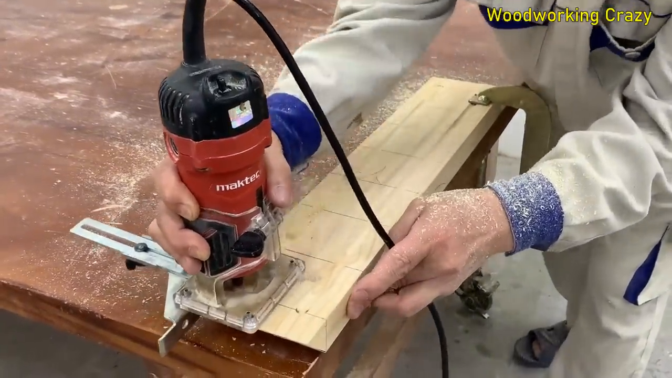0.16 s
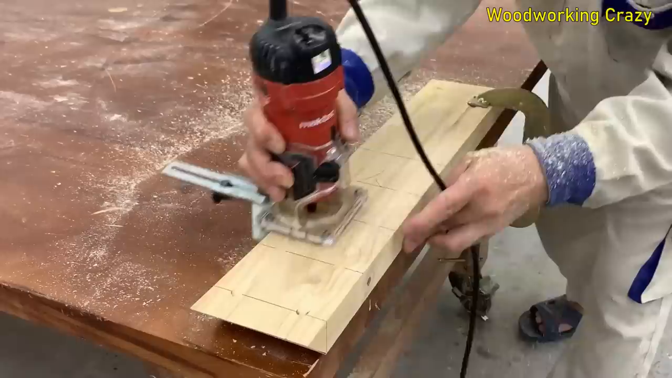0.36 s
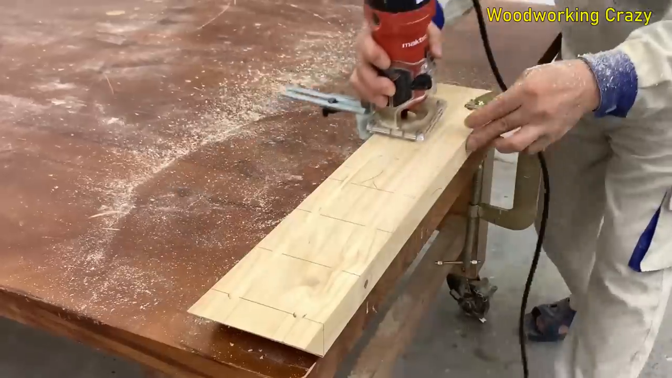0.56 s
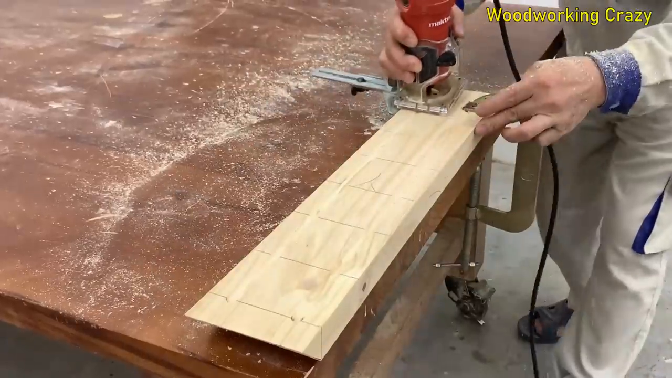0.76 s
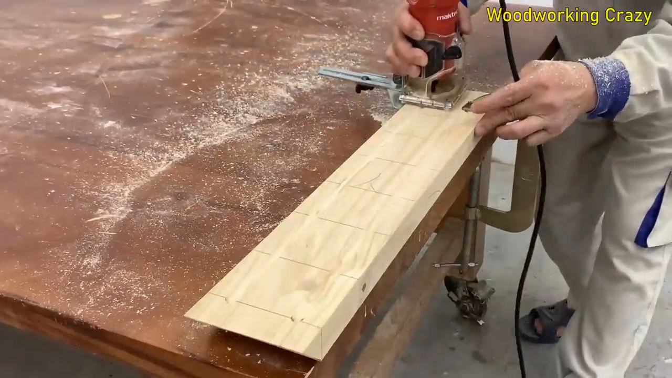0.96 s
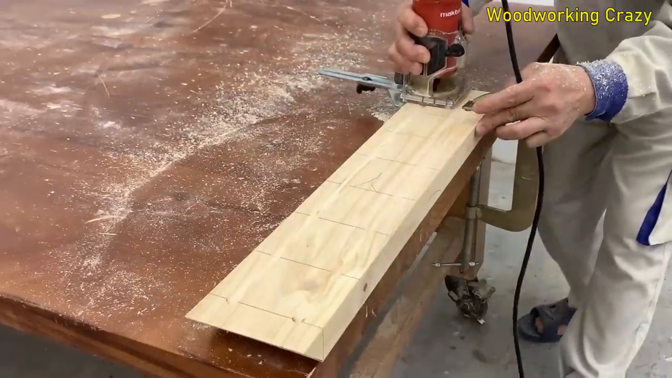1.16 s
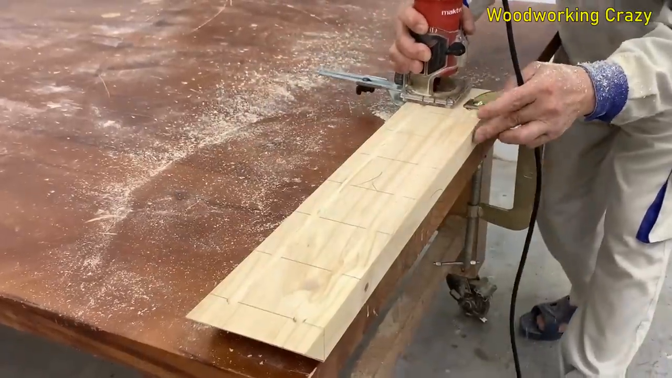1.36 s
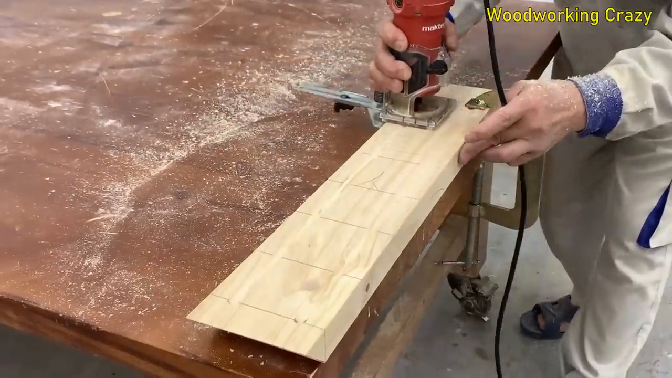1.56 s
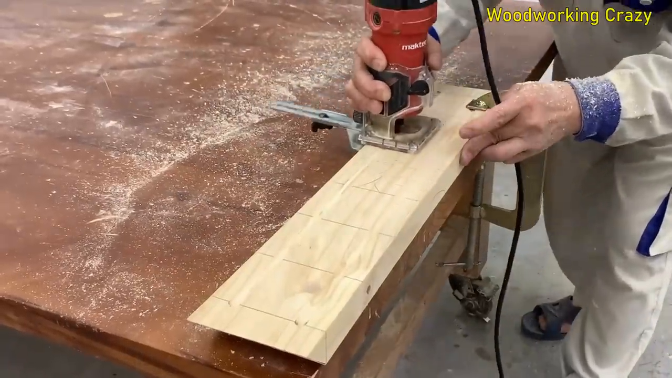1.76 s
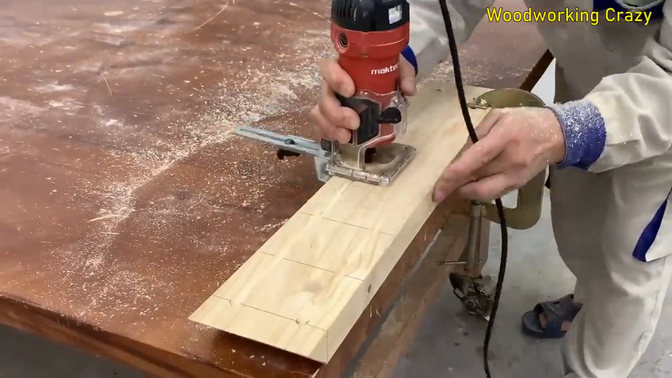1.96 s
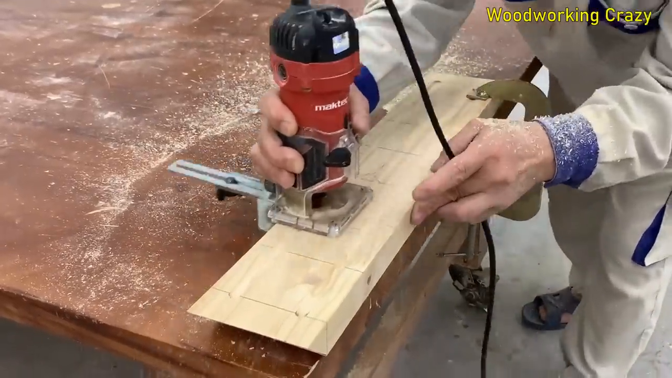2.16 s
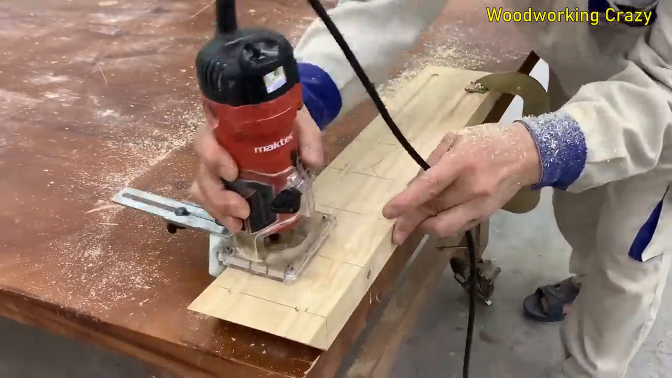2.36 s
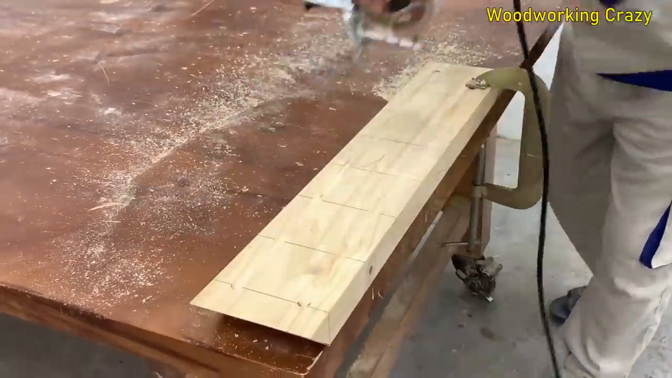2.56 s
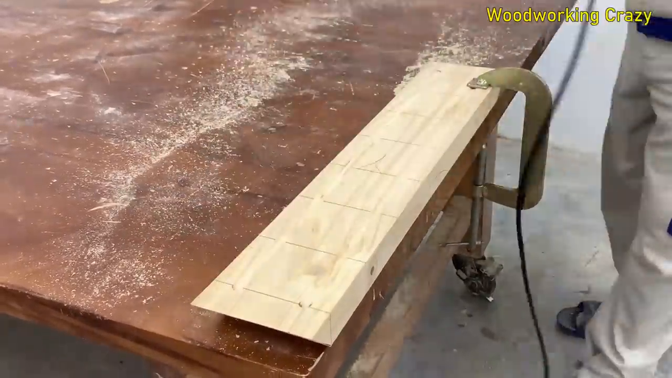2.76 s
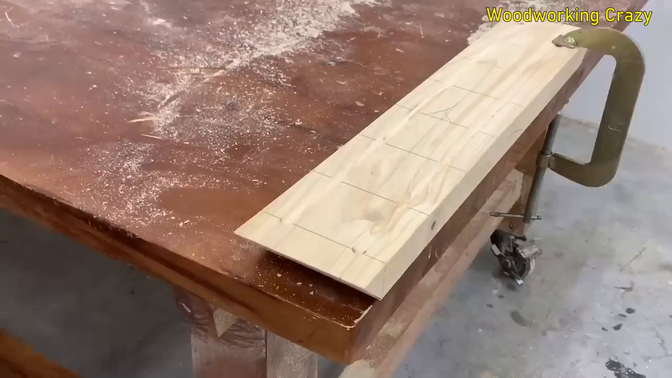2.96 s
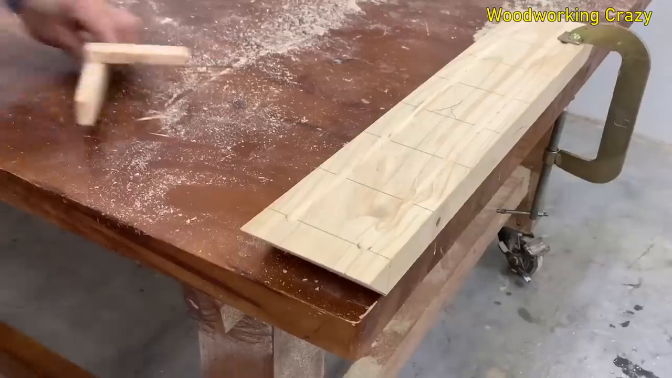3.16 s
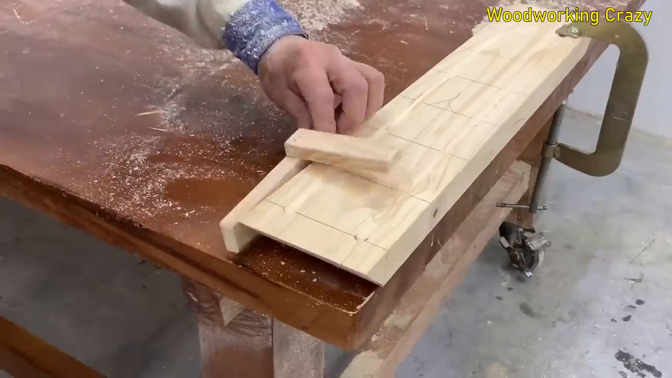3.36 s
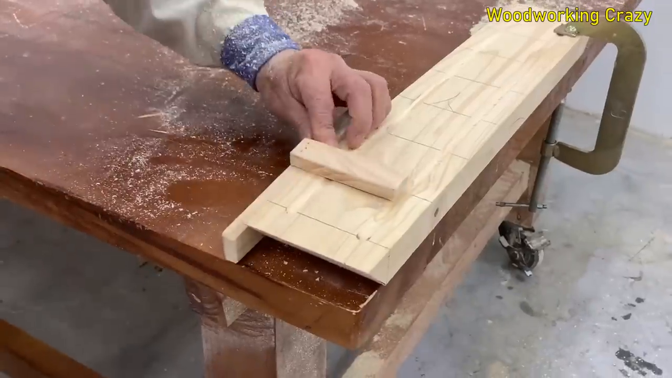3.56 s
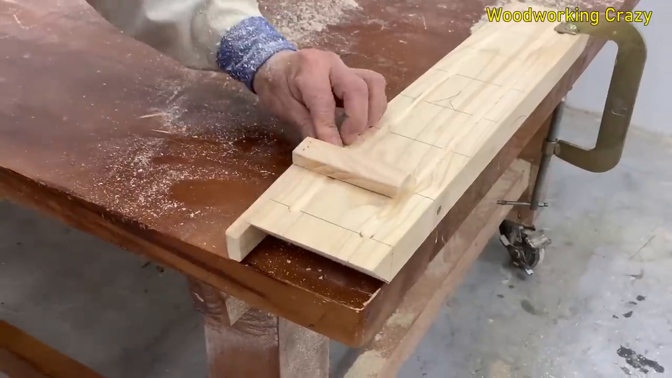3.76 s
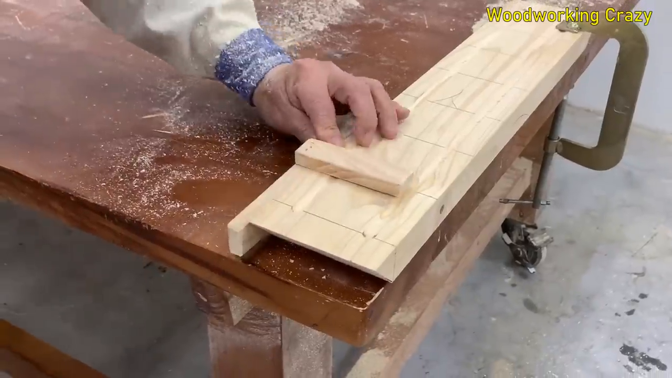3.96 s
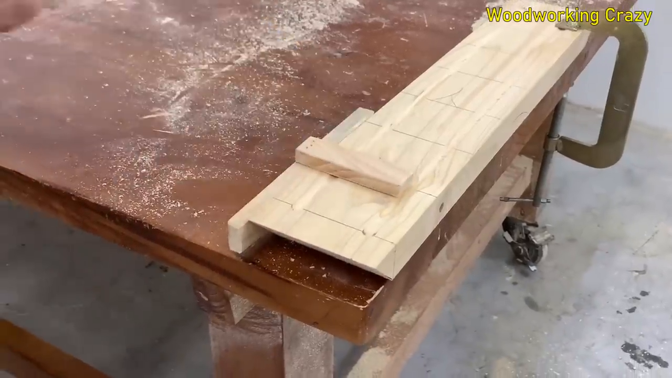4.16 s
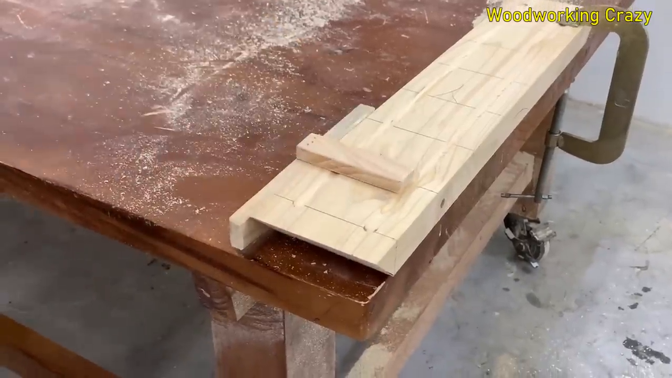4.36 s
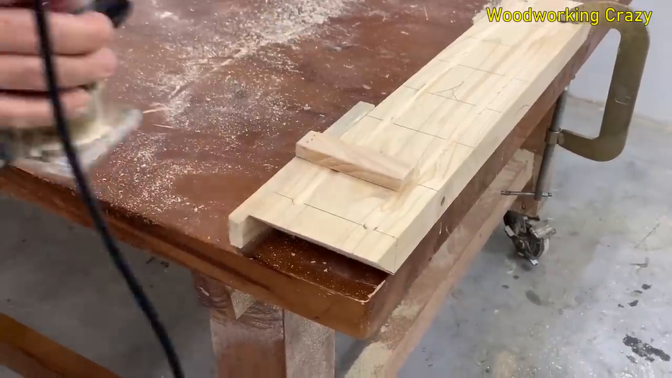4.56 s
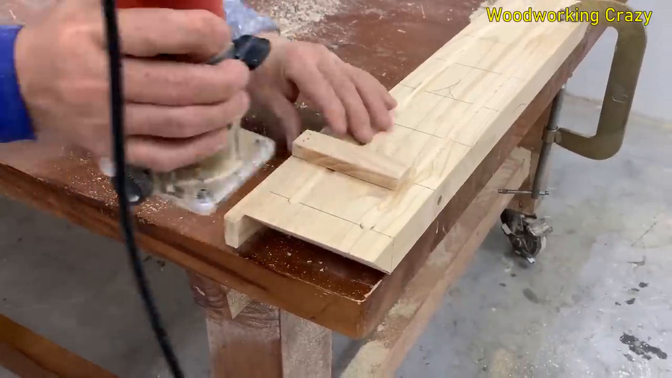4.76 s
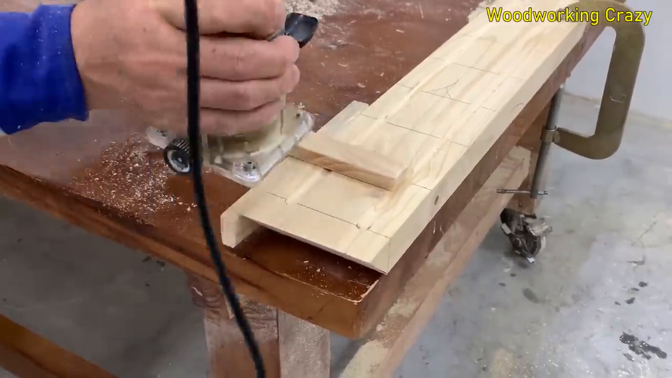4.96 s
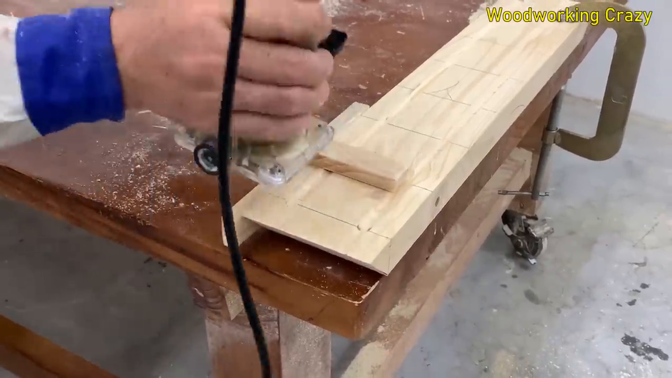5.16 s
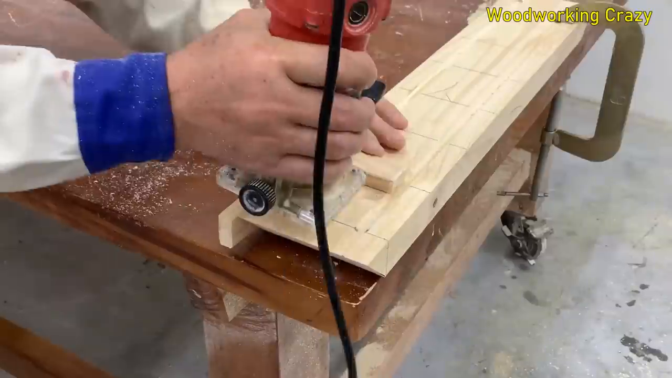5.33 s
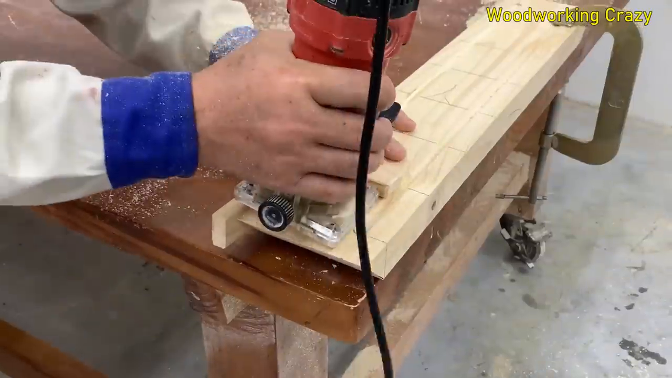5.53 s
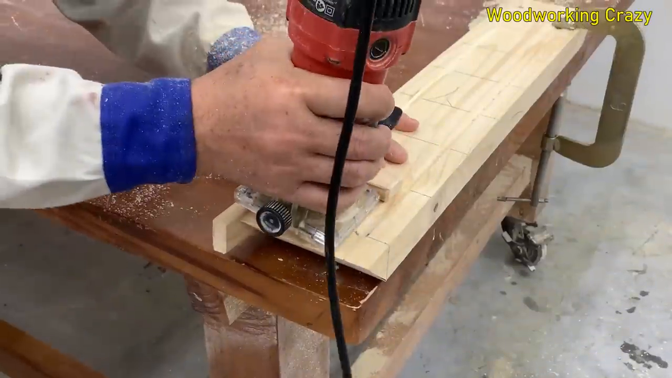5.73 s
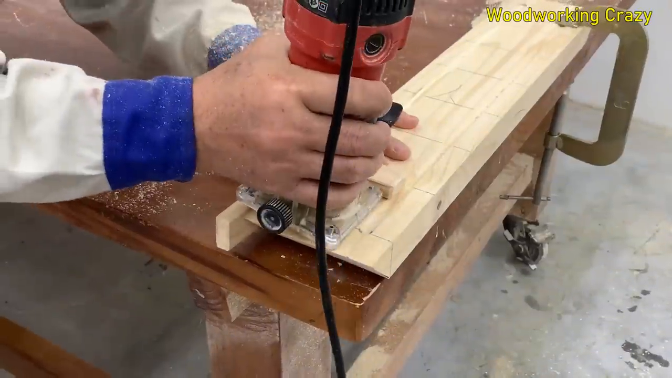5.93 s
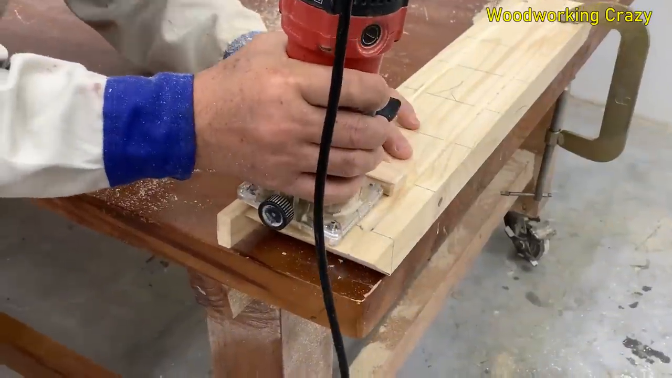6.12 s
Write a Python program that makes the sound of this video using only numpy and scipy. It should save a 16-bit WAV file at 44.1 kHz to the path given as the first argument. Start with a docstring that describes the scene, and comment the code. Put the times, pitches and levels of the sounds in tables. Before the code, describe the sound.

Close stereo pickup in a workshop: a handheld router's broad, bright air noise surrounds a wavering whine. After a free run, it growls and chatters through wood, pitch dragging down a little. The sound stops abruptly, leaving a quiet drone and faint buzz, with dry clicks and knocks of a small wood piece and a slight dusty scuff. A jolt restarts the motor, which sweeps up rapidly to a hissy, unloaded whirr.

```python
"""In a workshop that drones behind it, a hand-held wood router whines up to speed and cuts a groove.
The cut drags its pitch down and lifts its overtones; its sound is cut off in an instant, a wooden block
is set down, then it runs up again. Sines at orders of the motor speed make the whine, shaped stereo noise
the air and the drone, sines the buzz, groans and whistles, shaken wood modes the block.
Two microphone ports a hand apart hear it."""
import sys
import numpy as np
from scipy import signal
from scipy.fft import rfft, irfft, next_fast_len
from scipy.io import wavfile
from scipy.ndimage import uniform_filter1d, map_coordinates

SR = 44100
rng = np.random.default_rng(int(sys.argv[2]) if len(sys.argv) > 2 else 0)


def int16_out(signal):
    """Quantize to a 16-bit WAV file."""
    q = np.round(np.clip(np.atleast_2d(signal).T, -1, 1) * 32767)
    wavfile.write(sys.argv[1], SR, q.astype(np.int16))


N = 277389

# Motor switch-ons. Each row: time in seconds, full-speed pitch before any sag in Hz.
STARTS = [(-0.674, 1621), (4.085, 1647.5)]
# Pitch lost in the first run: a brief dip in the run-up, then the drag of the cut.
# Each row: time in seconds, pitch lost in Hz.
SAG_HZ = [(0, 0), (.09, 24), (.24, 6), (.33, 0), (1.45, 0), (1.6, 8), (1.7, 25), (1.85, 76), (1.99, 85),
          (2.11, 75), (2.27, 82), (2.385, 96), (2.51, 63), (2.72, 31), (2.88, 15), (2.92, 32)]
# First order in the standing waves, one list per run. Each row: time in seconds, level in dB.
WHINE_DB = [
    [(0, -35), (.08, -26), (.14, -40), (.165, -9.5), (.2, -18), (.225, -37), (.258, -15), (.305, -39),
     (.35, -21.5), (.4, -39), (.49, -51), (.535, -32.5), (.66, -49), (.72, -38.5), (.86, -30.5), (1.0, -32),
     (1.1, -39), (1.3, -66), (1.37, -38.5), (1.45, -47), (1.586, -29.5), (1.816, -33), (1.87, -41),
     (2.0, -42), (2.1, -54), (2.21, -42), (2.35, -43), (2.43, -47), (2.49, -36), (2.57, -52), (2.81, -44.5),
     (2.92, -51)],
    [(4.45, -52), (4.62, -41), (4.734, -45.5), (4.97, -43.5), (5.13, -34.5), (5.39, -41.5), (5.5, -41),
     (5.63, -41), (5.76, -37), (5.93, -42), (6.02, -32), (6.29, -31.5)],
]
# First order between the ports as the router is moved. Each row: time in seconds, lead of the left in rad.
WHINE_LEAD_RAD = [(0, -2.4), (.13, -2.6), (.26, -5.5), (.35, -8.1), (.53, -12.3), (.72, -7.4), (.94, -9.4),
                  (1.24, -9.2), (1.59, -14.4), (2.02, -10.8), (2.29, -24.7), (2.57, -25), (2.92, -18),
                  (4.7, -16.5), (5.13, -20.9), (5.66, -18), (6.0, -20.2)]
# Orders 2 to 10 running free: level of each in dB.
FREE_DB = [-50, -50, -51, -58, -56, -55, -45, -62, -62]
# Cutter biting into the wood. Each row: time in seconds, half length in seconds,
# levels of orders 2, 3, 4 and 6 in dB.
BITES = [(1.414, 0.037, -51, -46, -26, -46), (1.48, 0.038, -36, -41, -32, -48),
         (1.57, 0.026, -29, -57, -36, -56), (1.668, 0.034, -32, -27.5, -33, -33),
         (1.734, 0.027, -31, -22.5, -32, -50), (1.797, 0.026, -27, -31, -27, -50),
         (1.86, 0.038, -32.5, -39, -39, -47), (1.985, .05, -47, -52, -35.5, -40),
         (2.11, 0.043, -27.5, -29, -34, -35), (2.303, 0.046, -32, -48.5, -28.5, -36),
         (2.364, 0.023, -49, -43, -34, -24.5)]
# Narrow hiss, sinking in pitch in each run. Each row: time in seconds, centre in Hz, level in dB.
SINKING_HISS = [(0, 11600, -56), (.6, 11000, -45), (2.9, 10900, -47), (4.4, 15300, -58), (4.53, 14600, -40),
                (4.7, 13300, -39), (4.9, 11900, -40), (5.1, 11300, -45), (6.29, 11000, -45)]
# Noise of the router, one list per run. Each row: time in seconds,
# base levels of the low, middle and treble bands in dB.
AIR_DB = [
    [(0, -60.5, -36.5, -41), (.38, -52, -35, -34), (.7, -54.5, -37.5, -34.5), (1.0, -54, -37.5, -35),
     (1.42, -57, -37.5, -34.5), (1.5, -50, -35, -32.5), (2.15, -50.5, -34.5, -29),
     (2.38, -48.5, -34.5, -30.5), (2.45, -51, -34, -30.5), (2.92, -52.5, -39.5, -30)],
    [(4.13, -50, -33, -33.5), (4.3, -50, -36, -33), (4.5, -48, -34.5, -31.5), (4.65, -49.5, -33, -29.5),
     (5.26, -51, -32.5, -30.5), (5.8, -52, -31.5, -31.5), (6.29, -51.5, -33, -33)],
]
# Noise spectra, low to high. Each row: frequency in Hz, relative density in dB per Hz.
RATTLE = [(190, -33.5), (330, -8), (371, -15), (555, -11), (927, -9.5), (1080, -10), (1900, -2),
          (2470, -30), (4180, -120)]
HOUSING = [(1500, -42.5), (1800, -24.5), (2100, -1.5), (2300, -1), (2550, 0.5), (2800, -0.5), (3050, -1.5),
           (3400, -29.5), (3900, -40)]
FAN = [(2600, -48), (3200, -2.5), (3700, 3), (4200, 2.5), (4700, -1), (5300, 0), (6000, -1), (6700, -1),
       (7500, -8), (9000, -28), (11000, -41)]
HISS = [(6000, -32.5), (7500, 0.5), (9000, -1.5), (11000, 1), (12500, -1.5), (14500, -4), (16500, -2)]
# Jolts of current. Each row: time in seconds, nominal level in dB.
SURGES = [(1.463, -34), (4.123, -27), (4.58, -48)]
# Workshop drone. Each row: time in seconds, base level in dB.
DRONE_DB = [(0, -56.5), (.75, -51), (2.45, -55), (2.9, -54), (2.98, -50.5), (4.3, -49.5), (4.6, -51.5),
            (6.29, -51)]
# Spectrum of the drone. Each row: frequency in Hz, relative density in dB per Hz.
DRONE = [(18, -67), (30, -41), (111, -18.5), (188, -2), (301, -7.5), (326, -10), (413, -16.5), (566, -13),
         (680, -20.5), (955, -17.5), (1060, -22.5), (2040, -25), (3360, -29.5), (8640, -40), (15800, -49)]
# Tones in the drone. Each row: frequency in Hz, level against the drone noise in dB.
DRONE_TONES = [(449, -17), (556, -9), (937, -23), (1112, -28)]
# Low groans of the bench. Each row: time in seconds, frequency in Hz, level in dB, half length in seconds.
GROANS = [(0.424, 450, -42, 0.018), (0.608, 370, -45.5, 0.081), (0.626, 431.5, -44, 0.068),
          (3.163, 449, -54, 0.017), (3.23, 449, -42, 0.01)]
# Mains buzz of windings. Each row: time in seconds, level of the fundamental in dB.
BUZZ_DB = [(0, -75), (.21, -83), (.33, -48), (.51, -64), (.66, -40), (.86, -52.5), (1.28, -54.5),
           (1.4, -64), (1.49, -46.5), (1.68, -40), (1.85, -51), (1.93, -40.5), (2.2, -69), (2.3, -54),
           (2.86, -55), (2.96, -69), (3.35, -52), (3.45, -68), (4.06, -75), (4.13, -42), (4.45, -54.5),
           (4.55, -65), (5.0, -53), (5.57, -64), (5.9, -43), (6.29, -56)]
# Taps of the block. Each row: time in seconds, base level in dB, frequency the blow favours in Hz.
TAPS = [(3.1482, -46, 1830), (3.1924, -36, 2290), (3.203, -31, 2250), (3.2116, -33, 2270),
        (3.223, -28, 2140), (3.5309, -46, 1130), (3.5577, -42, 2980), (3.5739, -33.5, 3550),
        (3.581, -33, 1430), (3.5963, -38, 1510)]
# Modes of the wood. Each row: frequency in Hz, level in dB, 60 dB decay time in seconds.
WOOD_MODES = [(460, -4, .06), (1460, -8, .04), (1600, 0, 0.05), (2220, -3, 0.045), (2290, 1, 0.045),
              (2850, -2, 0.035), (3200, -3, .03), (3550, 0, .035), (4240, -8, .03), (6040, -8, .02)]
# Block sliding over dust. Each row: time in seconds, level in dB, half length in seconds.
SCUFFS = [(3.236, -59, 0.059), (3.258, -51.5, 0.016), (3.58, -60, 0.017), (3.95, -60, 0.042)]
# Spectrum of the slides. Each row: frequency in Hz, relative density in dB per Hz.
DUST = [(2500, -25), (5000, -1), (8000, -7), (11000, -8), (16500, -15)]
# Breathy whistles. Each row: time in seconds, frequency in Hz, level in dB, half length in seconds.
WHISTLES = [(4.66, 2290, -42, 0.088), (4.855, 2340, -39, .04), (5.797, 2860, -29, 0.035),
            (5.85, 2740, -30.5, 0.03), (5.873, 2550, -37, 0.065)]
# Noise at the ports. Each row: frequency in Hz, left-right correlation before the phase lead.
LIKENESS = [(60, .4), (140, 0.66), (300, 0.84), (600, 0.76), (900, 1), (1400, 0.092), (2200, 0.62),
            (3000, 0.55), (3700, 0.18), (5000, 0.18), (9500, 0.11), (15000, 0.083)]
# Spacing of the ports. Each row: frequency in Hz, lead of the left port in rad.
PORT_LEAD_RAD = [(250, -.3), (520, 0), (860, 1.2), (1200, 2.4), (1720, 4.3), (2150, 5.4), (2600, 6.9),
                 (3100, 8.1), (3600, 6.4), (4300, 5.6), (5200, 4.8), (6400, 4.4), (7700, 7.3), (9500, 8.3),
                 (12500, 5.6), (15000, 6.5)]

SPIN_UP_S = 0.37  # time constant
CUT_OFF_S, BACK_S, SWELL_S = 2.917, 4.108, 0.036  # sound cut off, back, length of the swell
FULL_SAG_HZ, SHUDDER_DB, ROUGH_DB = 85, 4, 5  # pitch lost in a full cut; flutter of overtones, first order
WHINE_RIGHT_DB = 1.5  # first order louder at the right port
CUTTING_DB, OUT_S = -32, 2.39  # order 2 follows the sag until the cutter leaves the wood
RATTLE_DB, FAN_DB, HISS_DB = 10.5, 5.5, 3.5  # added to the base levels
FAN_AGAIN_DB = 3  # held differently in the second run, the fan stands out less
FAN_SHARE = 0.95  # share of the middle band in the fan's base level; the rest is treble
SURGE_RISE_S, SURGE_FALL_S, SURGE_RATTLE_DB, SURGE_HOUSING_DB = 0.021, 0.032, 1.5, 3
BUZZ_HZ = 300.3
SECOND_DB, SECOND_SAGGED_DB = -59, -25  # second harmonic of the buzz, and its change at full sag
TOP_HZ = 15850


def amp(db):
    """Amplitude for a level in dB."""
    return 10 ** (np.asarray(db) / 20)


def unit(x):
    """x scaled to rms 1."""
    return x / np.sqrt(np.mean(x ** 2) + 1e-20)


def along(points, hz):
    """(Hz, value) points read on a log axis."""
    f, v = np.transpose(points)
    return np.interp(np.log(hz + 1), np.log(f + 1), v)


def clock():
    """Time of each sample in seconds."""
    return np.arange(N) / SR


def curves(*tables):
    """One value per sample for each column after the time."""
    s, *cols = np.vstack(tables).T
    return [np.interp(clock(), s, c) for c in cols]


def bump(s, half_s):
    """Gaussian swell, down to 1/e at half_s from its centre."""
    return np.exp(-((clock() - s) / half_s) ** 2)


def wobble(rate_hz, channels=1):
    """Smooth random curves, rate_hz knots a second."""
    knots = int(N * rate_hz / SR) + 4
    return np.array([map_coordinates(rng.standard_normal(knots), [clock() * rate_hz])
                     for _ in range(channels)])


def filtered(x, response):
    """x times a complex response of frequency."""
    m = next_fast_len(N + SR // 2)
    return irfft(rfft(x, m) * response(np.fft.rfftfreq(m, 1 / SR)), m)[..., :N]


def ports(hz):
    """Half the phase lead between the ports on each side."""
    return np.exp(0.5j * along(PORT_LEAD_RAD, hz) * np.array([[1], [-1]]))


def rush(spectrum, patchy_db, streaky_db=3):
    """Stereo noise of rms 1 with broad patches and long narrow streaks (standing waves) of random gain."""
    z = signal.stft(rng.standard_normal((2, N)), nperseg=1024)[2]

    def field(bins, frames):
        grain = uniform_filter1d(rng.standard_normal(z.shape[1:]), bins, 0)
        return unit(uniform_filter1d(grain, frames, 1))

    def mid_side(hz):
        turn = np.arccos(np.clip(along(LIKENESS, hz), -1, 1)) / 2
        return amp(along(spectrum, hz)) * [np.cos(turn), np.sin(turn)]

    gain = amp(patchy_db * field(10, 5) + streaky_db * field(2, 30))
    pair = signal.istft(z * gain, nperseg=1024)[1][:, :N]
    mid, side = filtered(pair, mid_side)
    return unit(filtered(np.array([mid + side, mid - side]), ports))


def tone(turns, db, flutter_db, drift_rad):
    """A sine of nominal rms db; standing waves make level and phase waver at each port."""
    level = np.sqrt(2) * amp(db + flutter_db * wobble(21.96, channels=2))
    return level * np.sin(2 * np.pi * turns + drift_rad * wobble(7.6, channels=2))


def sag():
    """Pitch in Hz lost in the first run; the second loses none."""
    return curves(SAG_HZ)[0] * (clock() < BACK_S)


def speed():
    """Motor pitch in Hz: it nears full speed exponentially after each switch-on, less the sag."""
    (on, full), (again, full_again) = STARTS
    up = lambda s: 1 - np.exp(-(clock() - s) / SPIN_UP_S)
    return np.where(clock() < again, full * up(on), full_again * up(again)) - sag()


def running():
    """1 while the router sounds: its sound is cut off within milliseconds and comes back in a short swell."""
    after = np.clip(clock() - CUT_OFF_S, 0, 1)
    off = amp(-60 * after / 0.025) + amp(-10 - 60 * after / 0.083)
    back = np.clip((clock() - BACK_S) / SWELL_S, 0, 1) ** 0.67
    return np.minimum(off, 1) + back


def first_order(turns, sagged):
    """The motor's fundamental, fading in the standing waves and rougher as the pitch sags."""
    fading_db = (1 + 2.5 * sagged) * wobble(9, channels=2)
    fading_db = fading_db + ROUGH_DB * sagged * wobble(45, channels=2) + [[0], [WHINE_RIGHT_DB]]
    lead_turns = curves(WHINE_LEAD_RAD)[0] / (4 * np.pi) * np.array([[1], [-1]])
    return tone(turns + lead_turns, curves(*WHINE_DB)[0] + fading_db, flutter_db=2.3, drift_rad=0.1)


def overtones(turns, sagged, cut2, cut3, cut4, cut6):
    """Orders 2 to 10: a free level plus the cutter's bites, shuddering as the pitch sags."""
    held = amp(CUTTING_DB) * np.clip(sagged, 0, 1) ** 2 * (clock() < OUT_S)
    bite = [cut2 + held, cut3, cut4, cut4 * amp(-10.5), cut6,
            cut2 * amp(-20), cut2 * amp(-19.5), cut4 * amp(-16.5), cut6 * amp(-10)]
    free = [amp(db + 4.1 * wobble(7)[0]) for db in FREE_DB]
    # torque ripple puts a side tone beside order 2
    total = (free[0] + cut2) * tone(2 * turns + BUZZ_HZ * clock(), -18.5, flutter_db=1, drift_rad=0.4)
    free[6] = free[6] * (1 + amp(5) * bump(4.68, 0.07))  # the brushes sing out in the second run-up
    for k in range(9):
        shudder = amp(SHUDDER_DB * sagged * wobble(40))
        order = tone((k + 2) * turns, 0, flutter_db=2.5, drift_rad=0.3)
        total = total + (free[k] + bite[k]) * shudder * order
    return total


def sinking_hiss():
    """Fast pitch scatter blurs a sinking tone to a narrow band."""
    hz, db = curves(SINKING_HISS)
    turns = np.cumsum(hz + 170 * wobble(250)[0]) / SR
    return tone(turns, db, flutter_db=1.5, drift_rad=0.3)


def whine():
    """Orders of the motor speed; the cutter adds strong overtones while it bites."""
    hz = speed()
    turns = np.cumsum(hz) / SR
    sagged = sag() / FULL_SAG_HZ
    cuts = sum(amp(np.array(dbs))[:, None] * np.exp(-((clock() - s) / half_s) ** 4)
               for s, half_s, *dbs in BITES)
    chatter = (amp(-60) + cuts[0] * amp(-21)) * tone(turns * 3 / 4, 0, flutter_db=2.5, drift_rad=0.4)
    mains = BUZZ_HZ * clock()  # torque ripple puts side tones beside the first order
    beside = (tone(turns - mains, -62.5, flutter_db=6, drift_rad=0.29)
              + tone(turns + mains, -55, flutter_db=4, drift_rad=0.52)
              + tone(turns + 2 * mains, -51, flutter_db=6, drift_rad=0.21))
    spun_up = np.clip((hz - 900) / 350, 0, 1)  # the lines emerge as the motor nears its speed
    lines = spun_up * (overtones(turns, sagged, *cuts) + chatter + beside)
    return spun_up * first_order(turns, sagged) + filtered(lines + sinking_hiss(), ports)


def surge():
    """Amplitude of the current jolts: quick rise, slower fall."""
    total = 0
    for s, db in SURGES:
        t = np.clip(clock() - s, 0, None)
        total = total + amp(db) * 2 * (1 - np.exp(-t / SURGE_RISE_S)) * np.exp(-t / SURGE_FALL_S)
    return total


def airflow():
    """Cooling air, brushes and chips: noise in the housing's resonance, under and above it."""
    low_db, middle_db, treble_db = curves(*AIR_DB)
    fan_db = FAN_SHARE * middle_db + (1 - FAN_SHARE) * treble_db
    fan_db = fan_db + np.where(clock() < BACK_S, FAN_DB, FAN_AGAIN_DB)
    jolt = surge()
    gust = lambda db: amp(db * wobble(12)[0])
    rattle = amp(low_db + RATTLE_DB) * gust(1.4) + amp(SURGE_RATTLE_DB) * jolt
    housing = amp(middle_db) * gust(1) + amp(SURGE_HOUSING_DB) * jolt
    fan = amp(fan_db) * gust(0.27)
    hiss = amp(treble_db + HISS_DB) * gust(0.27)
    return (rattle * rush(RATTLE, patchy_db=1.5)
            + housing * rush(HOUSING, patchy_db=1, streaky_db=2.5)
            + fan * rush(FAN, patchy_db=1.5)
            + hiss * rush(HISS, patchy_db=2.34, streaky_db=3.5))


def buzz():
    """A surge of current sharpens the buzz, so its upper harmonics follow the second."""
    turns = BUZZ_HZ * clock()
    second_db = SECOND_DB + SECOND_SAGGED_DB * sag() / FULL_SAG_HZ + wobble(4)[0]
    sharpness = running() * (amp(second_db) + surge())
    fundamental = tone(turns, curves(BUZZ_DB)[0], flutter_db=3, drift_rad=0.17)
    second = tone(2 * turns, 0, flutter_db=0, drift_rad=0.27)
    upper = sum(tone(k * turns, -11 - 0.71 * k, flutter_db=5, drift_rad=0.65) for k in range(3, 10))
    return fundamental + sharpness * (second + upper)


def workshop():
    """Distant machines drone as noise and steady tones; the bench groans now and then."""
    tones = sum(tone(hz * clock(), db, flutter_db=1, drift_rad=0.45) for hz, db in DRONE_TONES)
    groans = sum(bump(s, half_s) * tone(hz * clock(), db, flutter_db=1.5, drift_rad=0.3)
                 for s, hz, db, half_s in GROANS)
    return amp(curves(DRONE_DB)[0] + 2.5) * (rush(DRONE, patchy_db=1) + tones) + groans


def block():
    """Each tap shakes the wooden block for a moment and favours the modes near one pitch; slides hiss."""
    taps = np.zeros((2, N + SR))
    t = np.arange(SR // 4) / SR
    for s, db, near_hz in TAPS:
        ring = 0
        for hz, level_db, t60_s in WOOD_MODES:
            off_pitch_db = 22 * abs(np.log2(hz / near_hz))
            ring = ring + amp(level_db - off_pitch_db - 60 * t / t60_s) * np.sin(2 * np.pi * hz * t)
        shake = amp(-60 * t / 0.028) * rng.standard_normal((2, len(t)))
        knock = signal.fftconvolve(shake, ring[None], axes=1)[:, :len(t)]
        start = round(s * SR)
        taps[:, start:start + len(t)] += amp(db + 1) * (knock / np.abs(knock).max() + 0.054 * shake)
    slides = sum(amp(db) * bump(s, half_s) for s, db, half_s in SCUFFS)
    return taps[:, :N] + slides * rush(DUST, patchy_db=4, streaky_db=0)


def whistles():
    """Short whistles sound for a moment; near 5.8 s the bit squeals against the wood. Fast pitch scatter makes
    them breathy."""
    notes = 0
    for s, hz, db, half_s in WHISTLES:
        turns = np.cumsum(hz + 50 * wobble(150)[0]) / SR
        notes = notes + bump(s, half_s) * tone(turns, db, flutter_db=4, drift_rad=0.3)
    return filtered(notes, ports)


def scene():
    """Whine and airflow are gated by running(); the other layers are added to them."""
    router = running() * (whine() + airflow())
    return router + buzz() + workshop() + block() + whistles()


def record(dry):
    """The microphones lose the deep bass; nothing is kept above the band limit."""
    bass_cut = filtered(dry, lambda hz: (1j * hz / (100 + 1j * hz)) ** 2)
    return filtered(bass_cut, lambda hz: 1 / (1 + (hz / TOP_HZ) ** 300))


dry = scene()
out = record(dry)
int16_out(out)
```